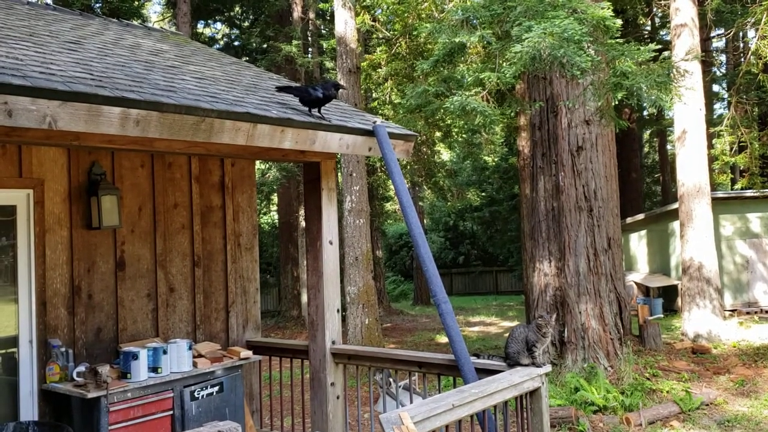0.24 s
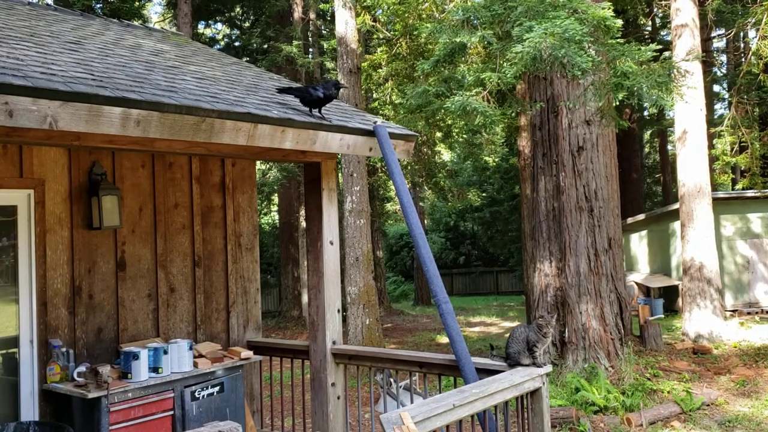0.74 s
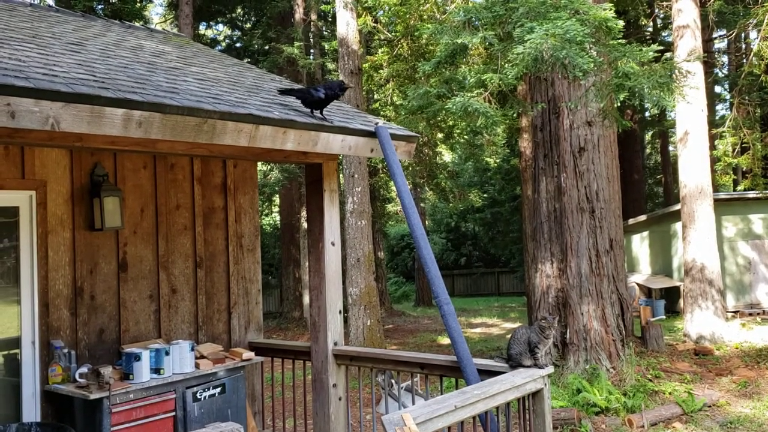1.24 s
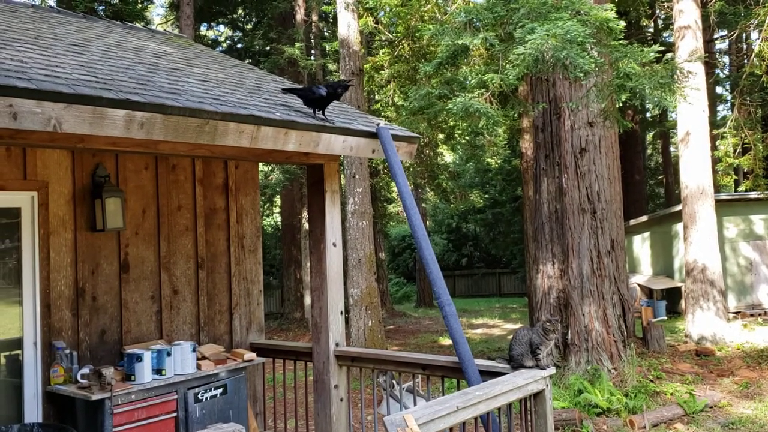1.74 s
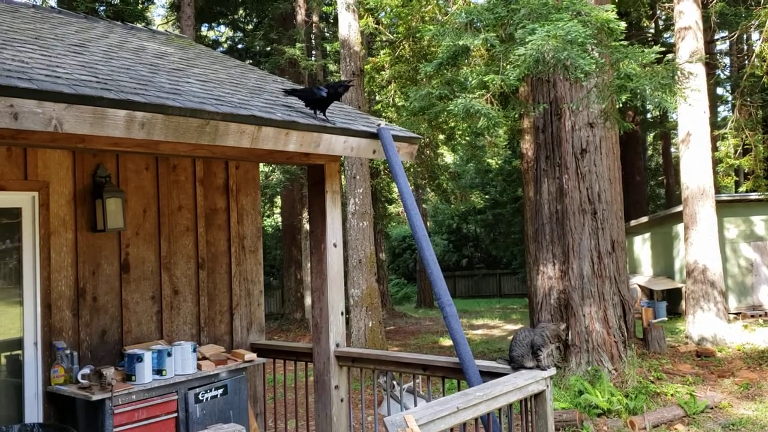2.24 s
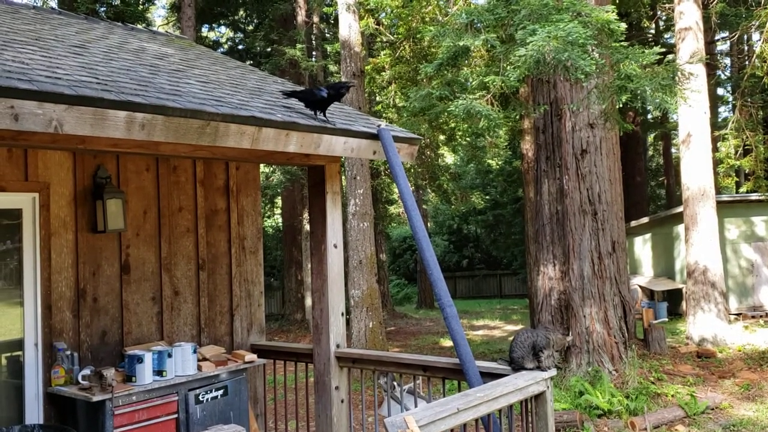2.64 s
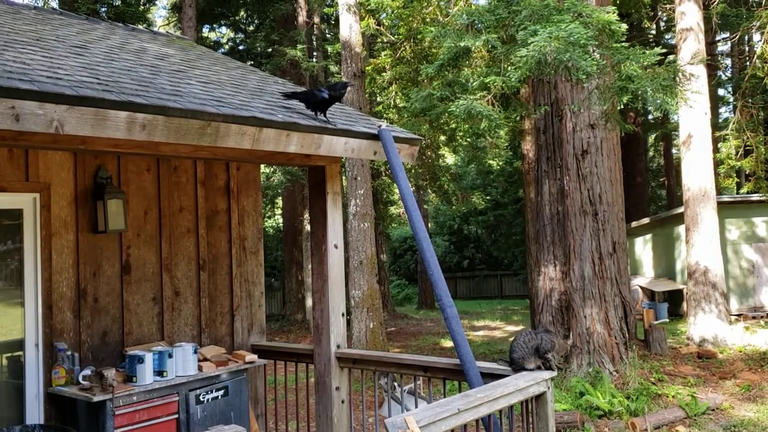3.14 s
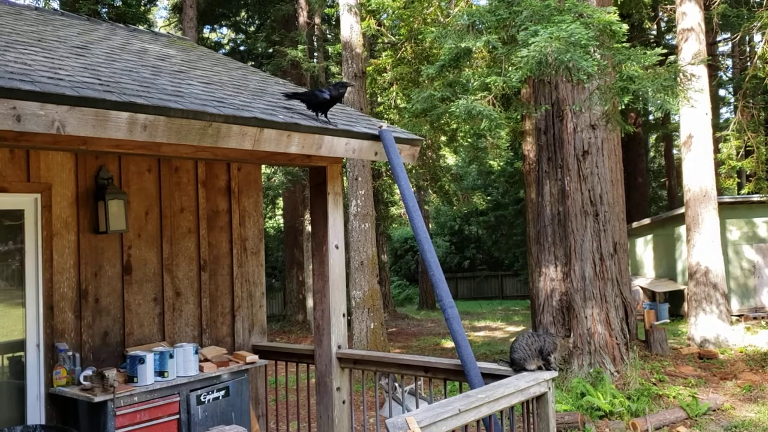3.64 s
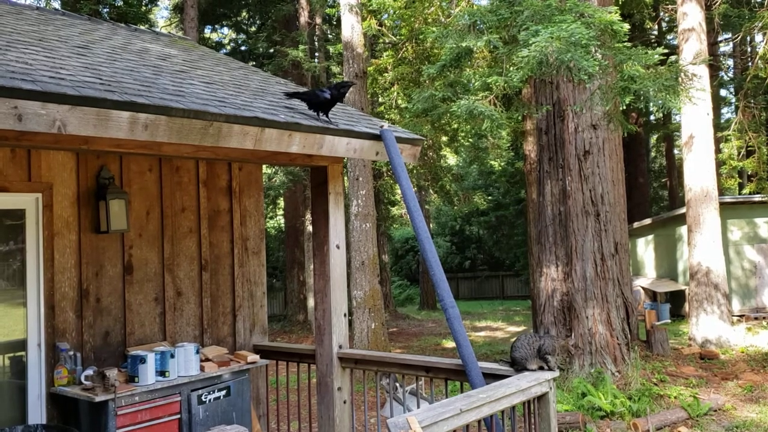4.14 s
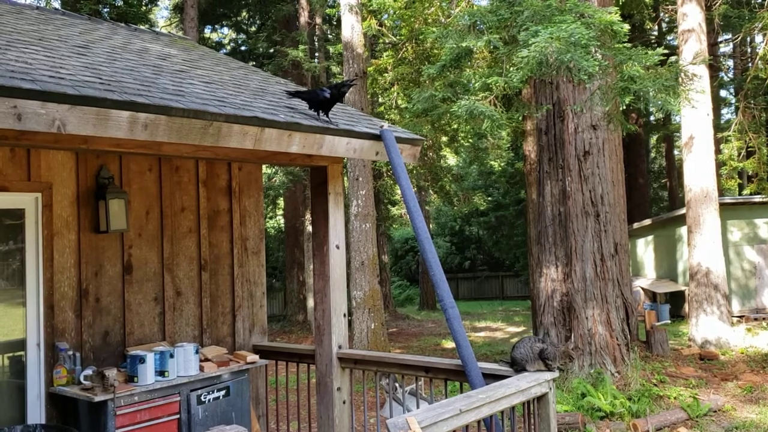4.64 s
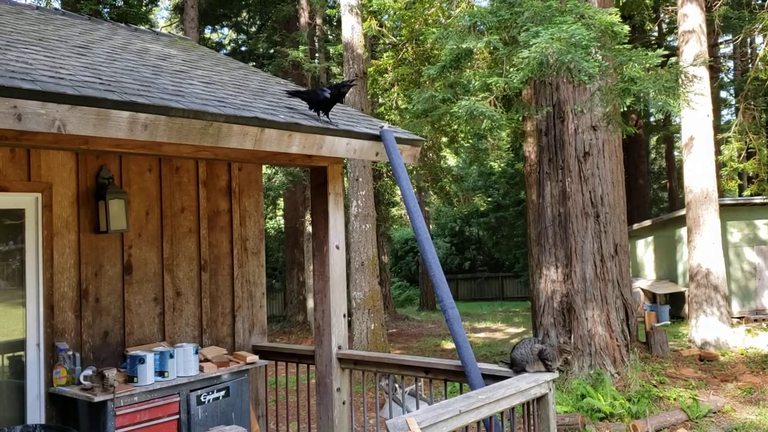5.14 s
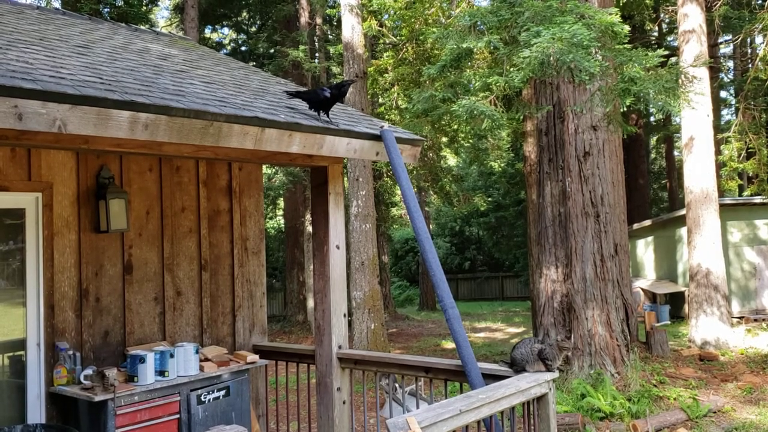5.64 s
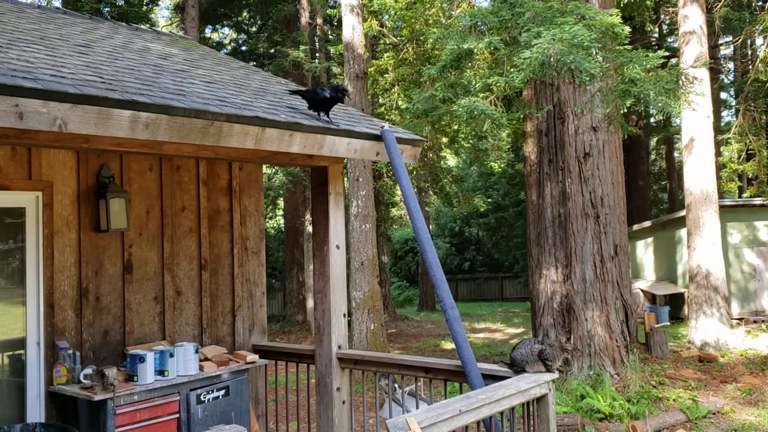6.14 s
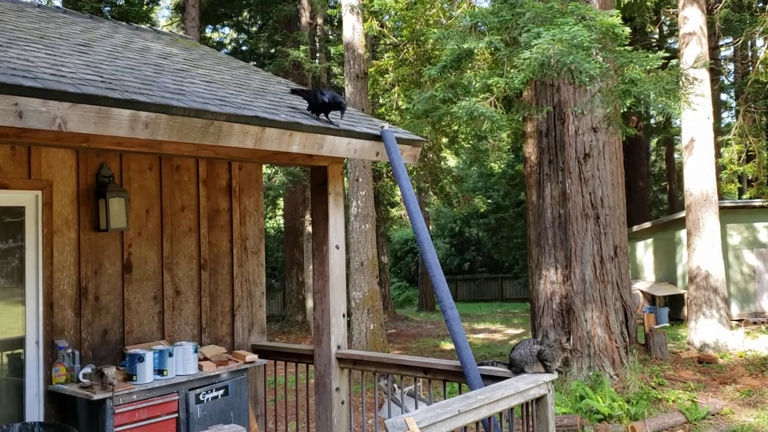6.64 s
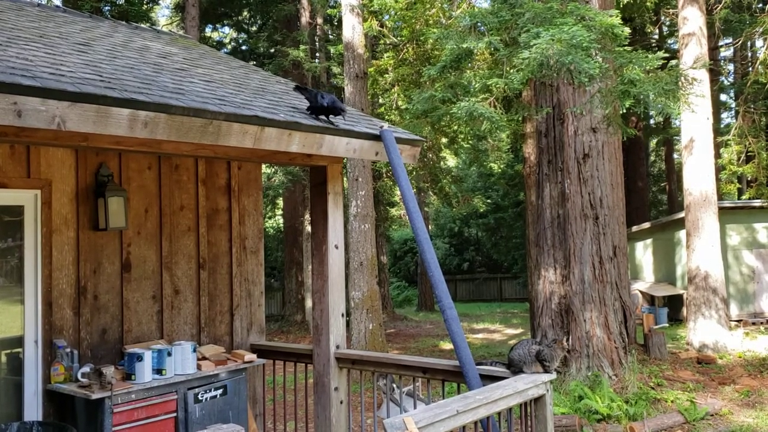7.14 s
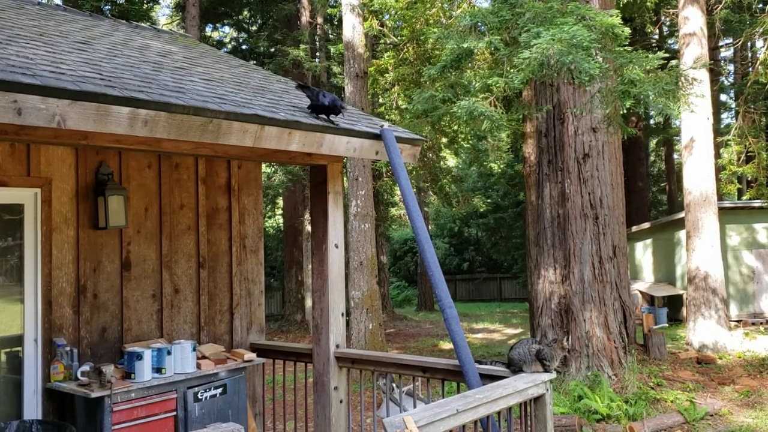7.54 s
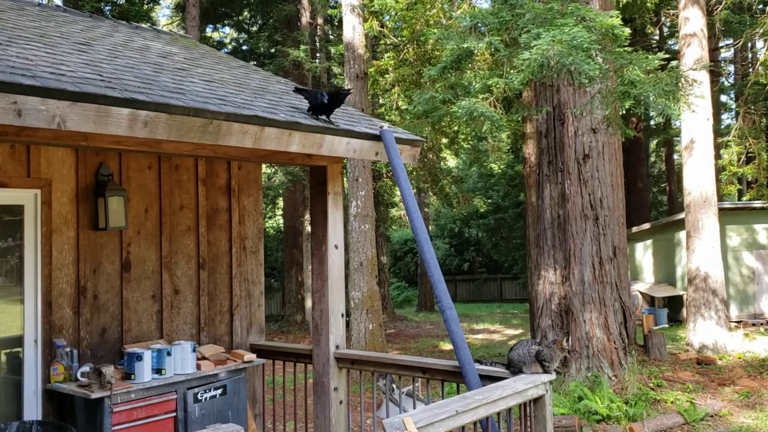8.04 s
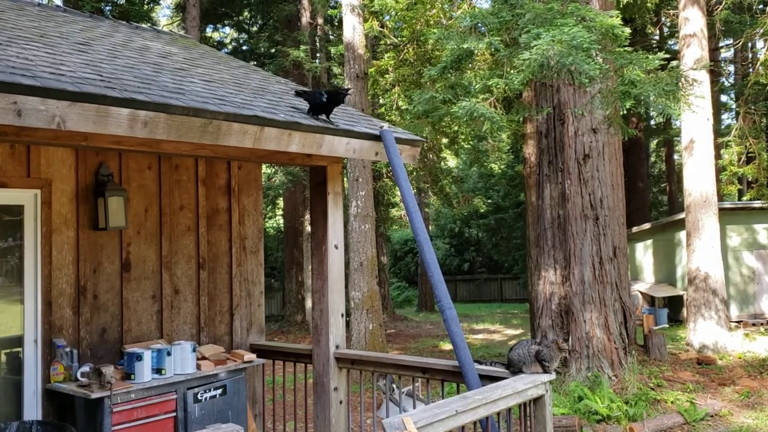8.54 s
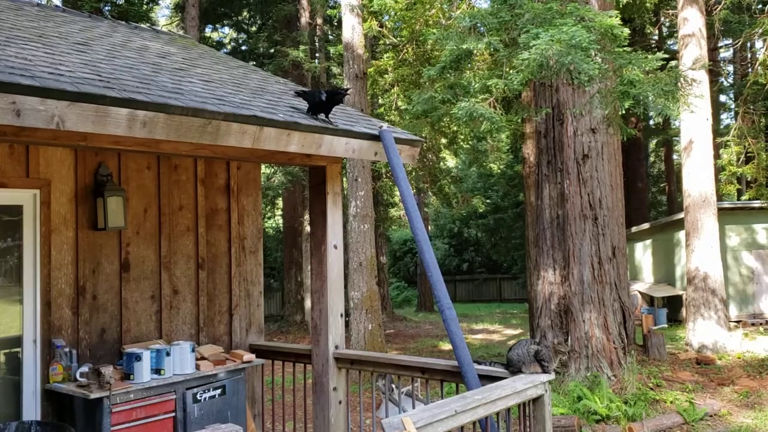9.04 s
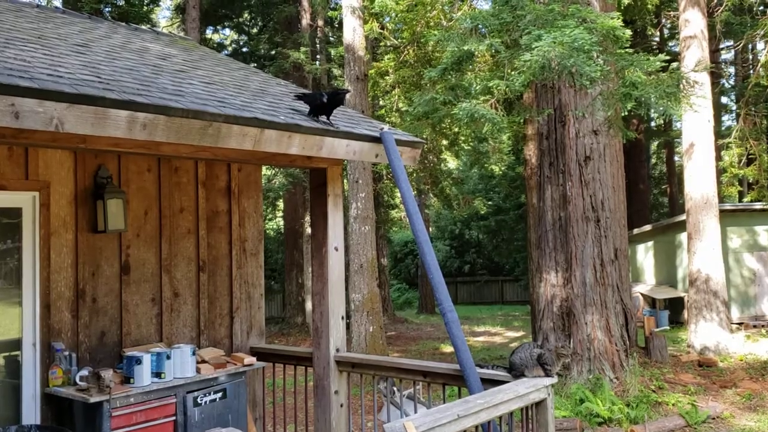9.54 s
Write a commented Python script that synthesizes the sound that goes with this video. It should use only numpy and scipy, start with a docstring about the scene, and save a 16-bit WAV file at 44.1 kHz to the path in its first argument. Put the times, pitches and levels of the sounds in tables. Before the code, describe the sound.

A raven on a porch roof in a quiet forest gives three hoarse, rattling croaks, pauses, and repeats the set twice more. Each croak echoes briefly off the porch and trunks. Small birds chip and whistle faintly far away over still air and a thin hiss. Light gusts rumble on the microphone, with a few soft knocks and a quick double tick on the left before the last set.

```python
"""On a porch roof in a quiet forest, a raven gives three bouts of three croaks. Each croak is a slowing
train of membrane snaps filtered by the resonances of throat and beak; porch and trunks reflect it.
Small birds chip and whistle far off, over still air and a faint narrow hiss. Gusts rumble on the
microphone, small knocks sound about the porch, and something ticks twice against the left port."""
import sys
import numpy as np
from scipy import signal
from scipy.fft import rfft, irfft
from scipy.io import wavfile
from scipy.ndimage import uniform_filter1d

SR = 44100
rng = np.random.default_rng(int(sys.argv[2]) if len(sys.argv) > 2 else 0)


def generate_wav(signal):
    """Clip the signal to [-1, 1] and save it as 16-bit WAV at the path in sys.argv[1]."""
    frames = np.transpose(np.atleast_2d(signal))
    scaled = np.clip(frames, -1, 1) * 32767
    pcm = np.round(scaled).astype(np.int16)
    wavfile.write(sys.argv[1], SR, pcm)


N = 431298
TAPS = 4096  # samples in a short impulse response

# Levels in the tables are relative; the functions set each source's gain.
# likeness of a diffuse field at the two microphone ports: f/Hz, signed coherence
PORT_COHERENCE = [(60, 0.67), (180, 1), (550, 0.5), (1650, -0.66), (4970, -0.16), (15000, -0.03)]
# noise spectra of still air, the hiss, gust rumble and deep buffeting: f/Hz, spectral level/dB
AIR_SPECTRUM = [(20, -12.5), (45, -8.5), (80, 4.5), (160, -7), (300, -2), (600, -8.5), (1100, -16.5),
                (1750, -22.5), (3300, -24.5), (5000, -27), (9000, -36), (13000, -26), (16000, -31)]
HISS_SPECTRUM = [(1500, -38.5), (2000, -9), (2280, -0.5), (2520, -1.5), (2900, -14), (3800, -36.5)]
RUMBLE_SPECTRUM = [(15, -20), (40, -13.5), (70, 1.5), (130, -6.5), (250, -8), (500, -19.5), (1200, -38),
                   (4000, -69)]
BUFFET_SPECTRUM = [(15, -25), (35, -9.5), (60, -1), (110, -11), (250, -35.5), (1000, -70.5)]
# puffs of air on the microphone: peak t/s, decay time constant/s, level/dB
AIR_PUFFS = [(.95, 0.11, -63), (1.44, .1, -62.5), (1.71, .7, -61), (3.98, 0.12, -62.5), (4.39, .14, -60.5),
             (4.85, 0.18, -55), (6.22, .18, -53.5), (7.2, .06, -64), (8.91, 0.14, -60), (9.23, 0.11, -49.5),
             (9.5, 0.34, -55.5)]
# thin bird notes: t/s, duration/s, start f/Hz, end f/Hz, level/dB
BIRD_NOTES = [(.31, 0.16, 4540, 4430, -78.5), (1.275, 0.1, 8250, 7950, -80), (1.437, .1, 8540, 7460, -81),
              (2.747, 0.13, 4540, 4520, -82), (7.3, 0.099, 1395, 1280, -83),
              (7.928, .13, 6400, 6465, -83.5), (8.883, 0.097, 6500, 6400, -72)]
# course of one falling chip: t/s, frequency ratio, level/dB
CHIP_CONTOUR = [(0, 1.33, -12), (.01, 1.13, -2), (.026, .98, 0), (.046, .98, 1), (.056, .93, -3),
                (.07, .8, -11), (.095, .66, -21)]
# reflections from roof, wall, posts and deck at each port: delay/s, signed gain
LEFT_ECHOES = [(.00417, 0.11), (.00557, -.39), (.00701, -0.17), (.00817, .19), (0.0113, -.56),
               (0.0168, -0.12), (0.0205, -.43), (.0241, 0.06), (0.0274, 0.52)]
RIGHT_ECHOES = [(.00457, -.3), (.0057, -.28), (.00835, -0.007), (0.0107, .35), (0.0128, .38),
                (0.0126, -0.021), (0.0195, .14), (.02151, 0.27), (0.0262, 0.3)]
# reverberation time among the trunks: f/Hz, T60/s
FOREST_T60 = [(200, 0.65), (500, 0.91), (850, 1.1), (1030, 1.5), (1250, 1), (2500, .65), (6000, 0.76),
              (8500, 0.15), (15000, 0.11)]
# knocks and rustles about the porch: t/s, level/dB, centre f/Hz, T60/s
PORCH_KNOCKS = [(0.919, -61, 487, .03), (3.58, -74, 2540, .04), (6.385, -64.5, 695, .2),
                (6.69, -68, 2800, 0.24), (9.582, -65, 870, 0.072)]
# croaks: t/s, duration/s, time for half the fall in snap rate/s, final rate/Hz, first effort (0-1),
# time for effort to rise by 1/s, level/dB, top treble level/dB
CROAK_GESTURES = [(1.5766, 0.21, .0387, 48.8, 0.44, 0.091, 0, -4),
                  (1.9598, 0.23, 0.043, 46.8, 0.48, 0.12, -1.5, -1.5),
                  (2.375, 0.25, 0.047, 42.3, 0.36, 0.077, -2, -6.5),
                  (4.3569, 0.22, 0.042, 47.4, 0.38, 0.057, -2, -8.5),
                  (4.7522, 0.25, 0.054, 47, 0.26, 0.067, -1.5, -3),
                  (5.2025, 0.26, 0.047, 48, 0.26, 0.079, -2.5, -3),
                  (8.1468, 0.2224, .0472, 46.86, 0.11, 0.052, -.5, 7),
                  (8.5637, 0.24, 0.04, 43.5, 0.51, 0.077, -1.5, 3.5),
                  (8.9876, 0.25, 0.05, 44.4, 0.21, 0.059, -2.5, 2.5)]
# resonances of throat and beak: nominal f/Hz, width/Hz, left level/dB, right level/dB
FORMANTS = [(378, 100, -14.5, -16), (444, 51, -10, -10.5), (1064.3, 296, -1.5, -4),
            (1688, 390, -19.5, -11.5), (2707, 467, -16.5, -23.5), (3580, 840, -22, -30),
            (4726, 1300, -21.5, -22), (6213, 810, -31.5, -31.5), (7350, 770, -38.5, -35.5),
            (11830, 5000, -56.5, -52), (15200, 12000, -62.5, -44.5)]
# flutter echo under the roof: round trip/s, share kept each trip
ROOF_FLUTTER = (.0083, .66)
# ticks against the left port: t/s, level/dB, treble level/dB
PORT_TICKS = [(6.668, -8.5, -11), (6.6765, 0, 0)]
# spectrum of a tick: f/Hz, level/dB
TICK_SPECTRUM = [(40, -71), (130, -8), (250, -9.5), (520, 1), (950, -2.5), (1450, -18), (2400, -6.5),
                 (4000, -14.5), (6200, -19.5), (8400, -43), (12300, -31), (16000, -53)]


def amp(db):
    """Amplitude ratio of a level in decibels."""
    return 10 ** (np.asarray(db) / 20)


def unit_rms(x):
    """Normalisation to unit mean power."""
    return x / np.sqrt(np.mean(x ** 2) + 1e-20)


def read(points, hz):
    """Interpolation of a table on a log-frequency axis."""
    f, value = np.transpose(points)
    return np.interp(np.log(hz + 1), np.log(f + 1), value)


def add(mix, start_s, sound):
    """Superposition: a sound adds to the mix from start_s on."""
    part = mix[..., max(round(start_s * SR), 0):][..., :sound.shape[-1]]
    part += sound[..., :part.shape[-1]]


def bins(size):
    """Fourier frequencies of a signal of this many samples."""
    return np.fft.rfftfreq(size, 1 / SR)


def minimum_phase(gain):
    """Causal impulse response whose phase follows from its log gain by the Hilbert transform."""
    log_gain = np.log(np.maximum(gain, 1e-5))
    mirrored = np.r_[log_gain, log_gain[-2:0:-1]]
    return np.fft.ifft(np.exp(signal.hilbert(mirrored).conj())).real


def diffuse(spectrum):
    """Diffuse field: noise from all directions is partly coherent at the two ports."""
    hz = bins(N)
    left, independent = rfft(rng.standard_normal((2, N)))
    coherence = np.clip(read(PORT_COHERENCE, hz), -1, 1)
    right = coherence * left + np.sqrt(1 - coherence ** 2) * independent
    return unit_rms(irfft(np.array([left, right]) * amp(read(spectrum, hz)), N))


def breeze(draught_db=-72.5, wander_db=5, wander_s=0.22, rise_s=0.065):
    """Wind strength: a wandering draught and exponentially rising and dying puffs add in power."""
    t, knots = np.arange(N) / SR, np.arange(200) * wander_s
    wander = np.interp(t, knots, rng.standard_normal(len(knots)))
    power = amp(draught_db + wander_db * wander) ** 2
    for peak_s, decay_s, db in AIR_PUFFS:
        envelope = np.exp(-np.maximum((peak_s - t) / rise_s, (t - peak_s) / decay_s))
        power += (amp(db) * envelope) ** 2
    return np.sqrt(power)


def air(still_db=-70, hiss_db=-76, rumble_gain_db=-2.5, buffet_gain_db=43):
    """Ambient and wind noise: rumble grows with wind strength, buffeting with its square."""
    still = amp(still_db) * diffuse(AIR_SPECTRUM) * amp([[2], [-2]])  # both lean to the left
    hiss = amp(hiss_db) * diffuse(HISS_SPECTRUM) * amp([[4], [-4]])
    wind = breeze()
    rumble = amp(rumble_gain_db) * wind * diffuse(RUMBLE_SPECTRUM)
    buffet = amp(buffet_gain_db) * wind ** 2 * diffuse(BUFFET_SPECTRUM)
    return still + hiss + rumble + buffet


def whistle(hz, waver=0.035):
    """Random frequency modulation broadens a pure tone into a thin, wavering note."""
    drift = unit_rms(uniform_filter1d(rng.standard_normal(SR), size=40))[:len(hz)]
    return np.sqrt(2) * np.sin(2 * np.pi * np.cumsum(hz * (1 + waver * drift)) / SR)


def songbirds(run_start_s=6.266, spacing_s=0.1803, chip_count=7):
    """Scattering by foliage blurs a distant run of falling chips and a few thin whistles."""
    song = np.zeros(N)
    knots, ratio, contour_db = np.transpose(CHIP_CONTOUR)
    t = np.arange(0, knots[-1], 1 / SR)
    # the run grows louder and lower toward its middle
    for k, arch in enumerate(np.sin(np.linspace(0, np.pi, chip_count))):
        hz = (6400 - 560 * arch) * np.interp(t, knots, ratio)
        envelope = amp(-74.5 + 7.5 * arch + np.interp(t, knots, contour_db))
        add(song, run_start_s + k * spacing_s, envelope * whistle(hz) * signal.windows.tukey(len(t), .1))
    for start_s, duration, start_hz, end_hz, db in BIRD_NOTES:
        hz = np.linspace(start_hz, end_hz, int(duration * SR))
        add(song, start_s, amp(db) * whistle(hz) * signal.windows.tukey(len(hz), .7))
    return amp(-3) * porch(np.array([song, song]), scatter_db=-3) + amp(-10) * forest(song)


def porch(x, scatter_db=-9, scatter_t60=0.3):
    """Early reflection: direct sound, echoes from near surfaces and scatter off railings and boards."""
    t = np.arange(2 * TAPS) / SR
    scatter = rng.standard_normal((2, len(t))) * amp(-60 * t / scatter_t60) * (t > .002)
    # small things scatter only short waves
    scatter = signal.lfilter(*signal.butter(1, 900, "high", fs=SR), scatter)
    echoes = np.zeros_like(scatter)
    for port, table in zip(echoes, (LEFT_ECHOES, RIGHT_ECHOES)):
        for delay, gain in table:
            add(port, delay, np.array([gain]))
    echoes = uniform_filter1d(echoes, size=3, axis=1)  # rough boards reflect less treble
    response = echoes + amp(scatter_db) * scatter / np.linalg.norm(scatter[0])
    response[:, 0] += 1  # direct path
    return signal.fftconvolve(x, response, axes=1)[:, :N]


def forest(x, build_s=0.035):
    """Reverberation: multiple scattering among trunks leaves a tail, each band dying at its own rate."""
    hz, t, bands = signal.stft(rng.standard_normal((2, SR)), SR, nperseg=256)
    t60 = read(FOREST_T60, hz)[:, None]
    bands *= amp(-60 * t / t60) * (1 - np.exp(-t / build_s))
    bands /= np.maximum(t60 / FOREST_T60[0][1], 1) ** 2  # long-lived bands start weaker
    tail = signal.istft(bands, SR, nperseg=256)[1]
    return signal.fftconvolve(np.atleast_2d(x), tail / np.linalg.norm(tail[0]), axes=1)[:, :N]


def knocks(right_db=-5, strike_db=24):
    """Damped broadband transients: a strike and a dying rustle, two octaves wide, with no clear ring."""
    out, t = np.zeros(N), np.arange(2 * TAPS) / SR
    for start_s, db, hz, t60 in PORCH_KNOCKS:
        drive = rng.standard_normal(len(t)) + amp(strike_db) * (t == 0)
        burst = signal.lfilter(*signal.butter(2, [hz / 2, hz * 2], "band", fs=SR), drive)
        add(out, start_s, unit_rms(burst) * amp(db - 60 * t / t60))
    return porch(out * amp([[0], [right_db]]))


def syrinx(duration, fall_s, final_hz, first_effort, swell_s, start_hz=74, fade_s=0.049):
    """Membrane oscillation: one snap a cycle, the rate slowing as the effort swells and then fades."""
    t = np.arange(int(duration * SR)) / SR
    rate = final_hz + (start_hz - final_hz) / (1 + (t / fall_s) ** 4)
    cycles = np.cumsum(rate) / SR
    times = np.interp(np.arange(int(cycles[-1]) + 1), cycles, t)
    swell = np.clip(first_effort + times / swell_s, 0, 1)
    fade = np.clip((duration - times) / fade_s, 0, 1)
    return times, swell * fade


def snap(effort, puff_decay_s=0.015, slap_s=0.0025, closing_s=0.00006, soft_hz=850, hard_hz=9000):
    """Impulsive excitation: a closure, a second slap and a puff of air, brighter with greater effort."""
    t = np.arange(TAPS) / SR
    pulse = rng.standard_normal(TAPS) * np.exp(-t / puff_decay_s)
    pulse *= amp(-4.5) * effort / np.linalg.norm(pulse)
    slap = amp(-8) * effort * np.array([.5, .5])
    add(pulse, slap_s * effort * rng.uniform(.5, 1), slap)
    # slap and puff roughen only the treble
    pulse = signal.lfilter(*signal.butter(1, 1300, "high", fs=SR), pulse)
    # the membranes take a moment to close, so the top treble is mostly air
    closing = np.exp(-(t / closing_s - 2) ** 2)
    add(pulse, 0, closing / closing.sum())
    cutoff_hz = soft_hz * (hard_hz / soft_hz) ** effort
    pole = np.exp(-2 * np.pi * cutoff_hz / SR)
    return effort * signal.lfilter([(1 - pole) ** 2], np.poly([pole, pole]), pulse)


def throat(effort, treble_db, tuning=1.0022, low_cut_hz=330, sag_hz=90):
    """Resonance of throat and beak, one response a port; the formants sink at low effort."""
    hz = bins(TAPS)
    sag = sag_hz * (.85 - effort)
    resonances = sum(amp([[left], [right]]) / (1 + 2 * ((hz - f * tuning + sag) / width) ** 2) ** 2
                     for f, width, left, right in FORMANTS)
    leak = amp(-29) / (1 + (hz / 1500) ** 4)  # some sound passes between the resonances
    treble_shelf = amp(treble_db / (1 + (7500 / (hz + 1)) ** 6))
    low_cut = hz ** 2 / (hz ** 2 + low_cut_hz ** 2)
    return np.array([minimum_phase(gain) for gain in (resonances + leak) * treble_shelf * low_cut])


def raven(gain_db=25.5, jitter_s=0.00028, shimmer_db=0.7):
    """Source and filter: snaps, each slightly irregular in time and strength, excite the throat."""
    out = np.zeros((2, N))
    for start_s, *gesture, db, treble_db in CROAK_GESTURES:
        times, efforts = syrinx(*gesture)
        for at, effort, (jitter, shimmer) in zip(times, efforts, rng.standard_normal((20, 2))):
            pulse = signal.fftconvolve(snap(effort)[None], throat(effort, treble_db), axes=1)
            add(out, start_s + at + jitter_s * jitter, amp(gain_db + db + shimmer_db * shimmer) * pulse)
    return out


def eaves(x, crossover_hz=2200, right_lag_s=0.00013):
    """Diffraction: long waves bend round the roof edge and flutter beneath; treble comes straight."""
    hz = bins(N)
    trip_s, kept = ROOF_FLUTTER
    delay = np.exp(-2j * np.pi * hz * trip_s)
    flutter = (delay + kept) / (1 + kept * delay)  # all-pass: spreads each pulse, keeps its colour
    port_lag = np.exp(-2j * np.pi * hz * np.array([[0], [right_lag_s]]))
    bent_share = 1 / (1 + (hz / crossover_hz) ** 8)
    response = np.sqrt(bent_share) * flutter * port_lag + np.sqrt(1 - bent_share)
    return irfft(rfft(x) * response, N)


def ticks(gain_db=17, right_db=-33):
    """Proximity: two dry ticks at the left port far outweigh their sound at the right and their echo."""
    out, hz = np.zeros(N), bins(TAPS)
    for start_s, db, treble_db in PORT_TICKS:
        spectrum_db = read(TICK_SPECTRUM, hz) + treble_db * hz / (hz + 2000)
        add(out, start_s, amp(gain_db + db) * minimum_phase(amp(spectrum_db)))
    return out * amp([[0], [right_db]]) + amp(-56) * forest(out)


def scene(forest_db=-23):
    """Superposition of the raven, its echoes and the quiet life around it."""
    croaks = eaves(raven())
    return porch(croaks) + amp(forest_db) * forest(croaks) + songbirds() + ticks() + knocks() + air()


def record(dry, cutoff_hz=15850):
    """Band limiting: a linear-phase low-pass filter removes the highest treble."""
    low_pass = signal.firwin(511, cutoff_hz, window=("kaiser", 9), fs=SR)
    return signal.oaconvolve(dry, low_pass[None], "same")


dry = scene()
out = record(dry)
generate_wav(out)
```